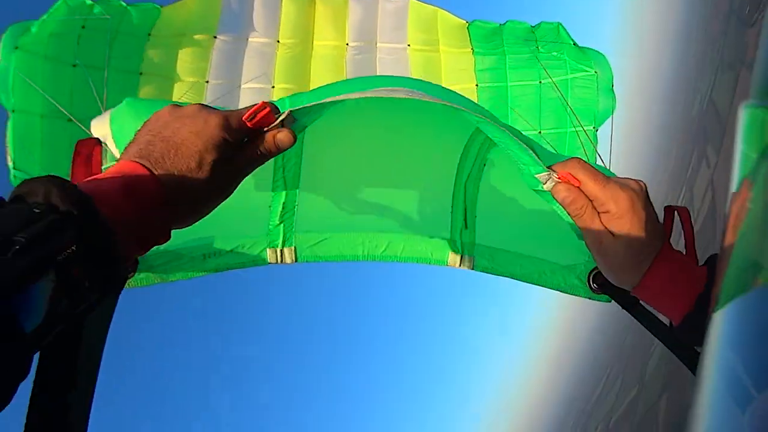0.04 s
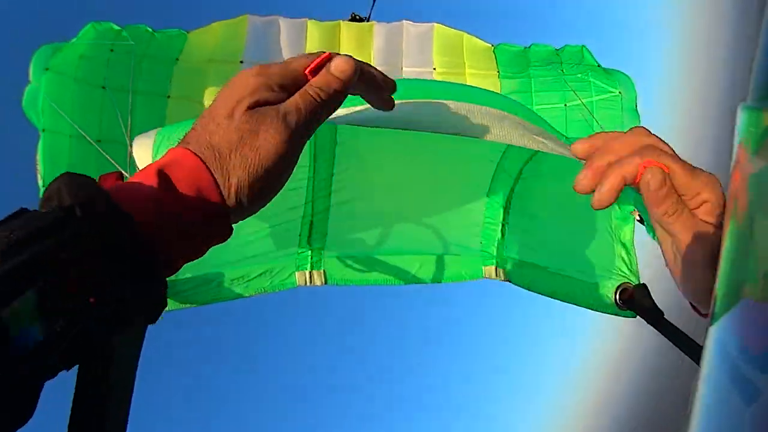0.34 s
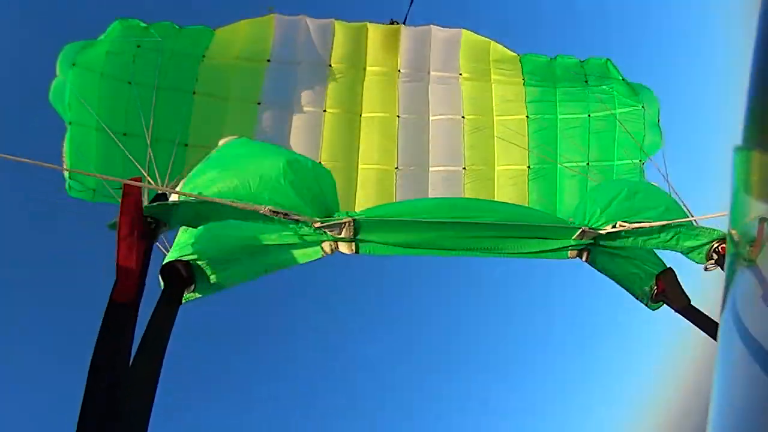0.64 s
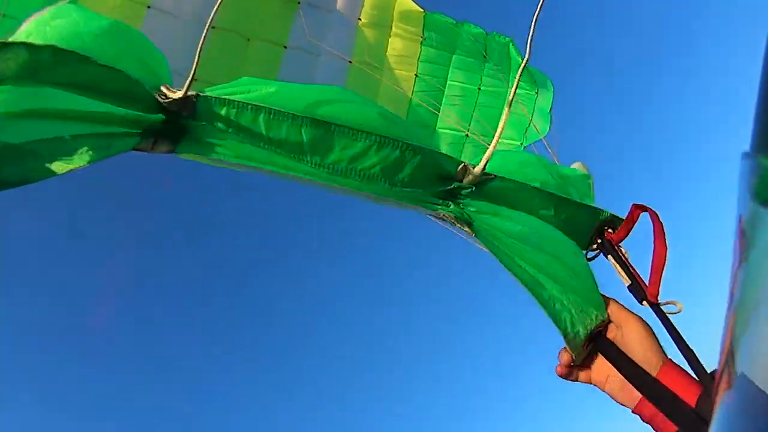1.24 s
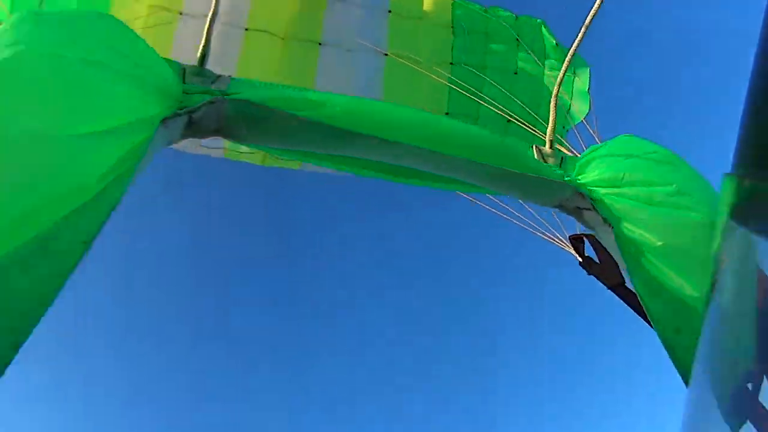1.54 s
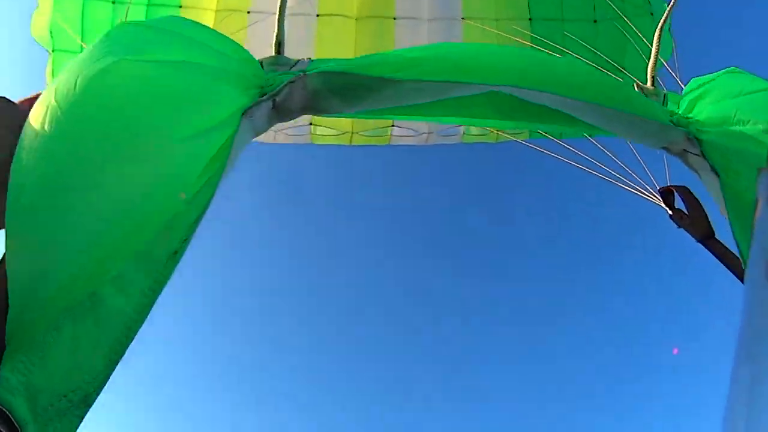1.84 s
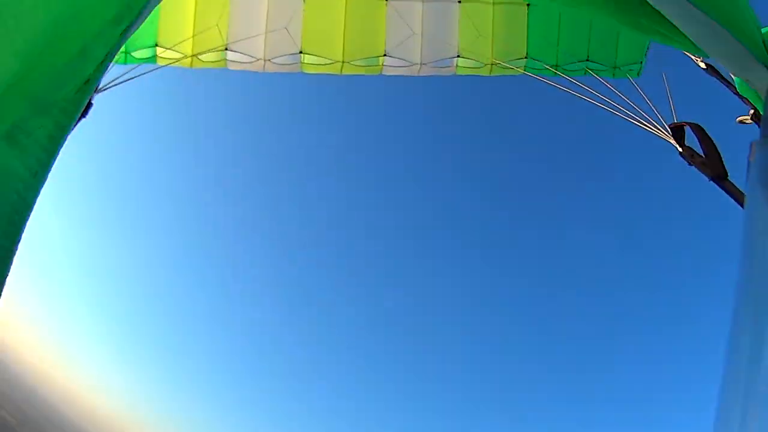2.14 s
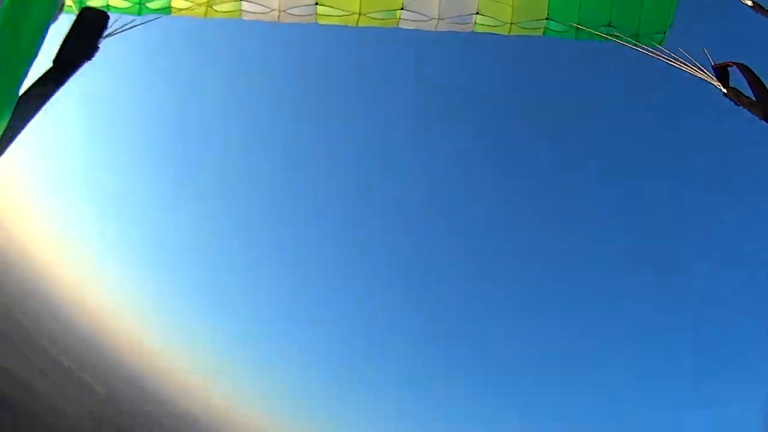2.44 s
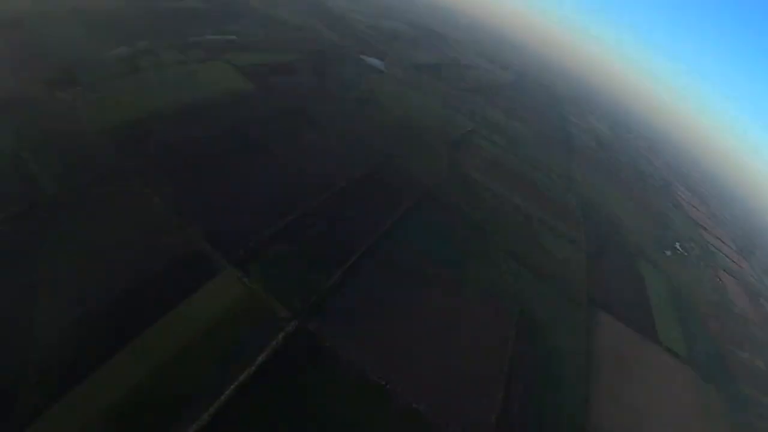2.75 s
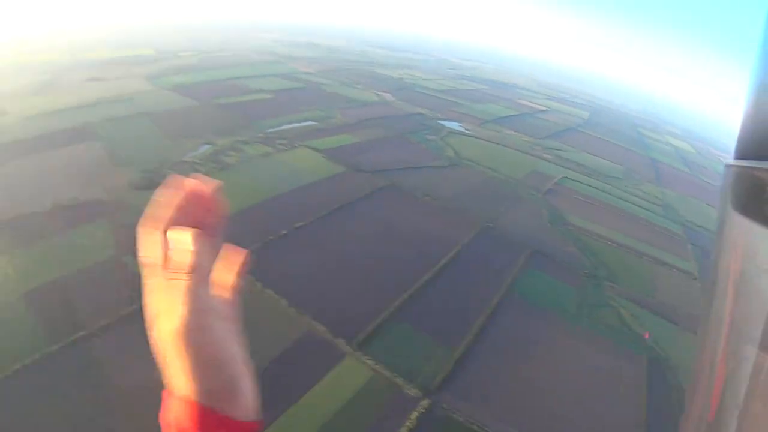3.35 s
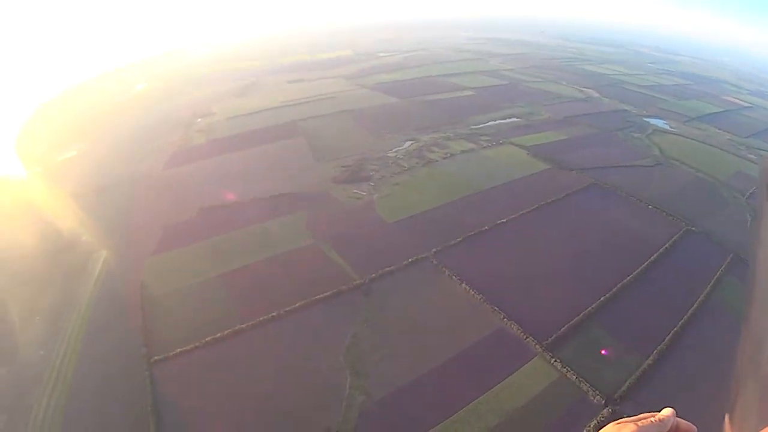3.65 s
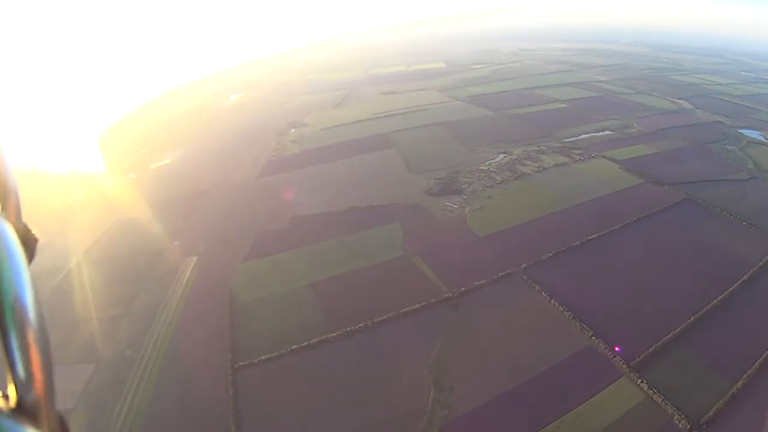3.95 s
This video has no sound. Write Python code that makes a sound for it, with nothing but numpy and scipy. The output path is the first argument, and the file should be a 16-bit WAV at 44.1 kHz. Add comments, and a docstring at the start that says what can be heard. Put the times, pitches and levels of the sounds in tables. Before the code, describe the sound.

Wind rushes and buffets a helmet microphone under an open parachute. For the first two seconds, fabric flaps, crackles and swishes close by as it is pulled down the lines. A low rumble follows, then a brief falling whistle around 2.5 seconds, and the wind drops to a softer rush. From 3.4 seconds it returns brighter and grows, with three light buckle clinks near 3.8 seconds.

```python
"""Wind on a helmet camera under an open parachute. From the start, turbulent eddies buffet the two
microphone ports over a smooth slipstream. Hands pull the fabric slider down the lines, and it flaps,
snaps, crackles and swishes. The head turns: its wake rumbles, the buffeting thins, and an edge tone
whistles and falls away, leaving the slipstream. Last, the turbulence returns from the side, brighter,
and a harness buckle rings three times."""
import sys
import numpy as np
from scipy import signal
from scipy.fft import rfft, irfft
from scipy.io import wavfile
from scipy.ndimage import uniform_filter1d, minimum_filter1d

SR = 44100
rng = np.random.default_rng(int(sys.argv[2]) if len(sys.argv) > 2 else 0)


def to_wav(s):
    """Save 16-bit WAV."""
    ch = np.atleast_2d(s).T  # columns
    pcm = np.round(np.clip(ch, -1, 1) * 32767)  # PCM
    wavfile.write(sys.argv[1], SR, pcm.astype(np.int16))


N = 176400
TIME = np.arange(N) / SR

# likeness of the two ports for eddies and for cloth: frequency_hz, coherence, right_lead_rad
EDDY_COHERENCE = [(30, 0.97, 0.21), (89, 0.95, 0.3), (200, 0.9, 1.13), (476, 0.65, 1.3), (660, 0.28, 2.55),
                  (1110, 0.51, 2.2), (1900, 0.87, 0.89), (2600, 1, 1.73), (3500, 0.49, 0.41),
                  (5100, 0.82, .05), (8000, .5, .2)]
CLOTH_COHERENCE = [(200, 0.91, .6), (1900, 0.96, 1), (2600, 1, 0.6), (5100, 0.88, .05), (9000, .6, .1)]


def amp(db):
    """Decibels to amplitude ratio."""
    return 10 ** (np.asarray(db) / 20)


def unit(x):
    """Normalisation to rms 1."""
    return x / np.sqrt(np.mean(x ** 2) + 1e-20)


def over_hz(table, hz):
    """Interpolation of each column of a table along log frequency."""
    f, *columns = np.transpose(table)
    return [np.interp(np.log(hz + 1), np.log(f + 1), column) for column in columns]


def level(curve):
    """Gain interpolated in decibels, fading at 400 dB/s beyond the ends of the curve."""
    time_s, db = np.transpose(curve)[:2]
    outside_s = np.maximum(np.maximum(time_s[0] - TIME, TIME - time_s[-1]), 0)
    return amp(np.interp(TIME, time_s, db) - 400 * outside_s)


def strikes(table, rise_s, decay_s):
    """Superposed envelopes of transients with exponential rise and decay."""
    start_s, db = np.transpose(table)
    age = np.maximum(TIME - start_s[:, None], 0)
    return amp(db) @ ((1 - np.exp(-age / rise_s)) * np.exp(-np.minimum(age / decay_s, 50)))


def swells(table):
    """Superposed Gaussian envelopes."""
    return sum(amp(db) * np.exp(-((TIME - middle) / sigma) ** 2 / 2) for middle, sigma, db in table)


def flutter(slow_hz, fast_hz):
    """Band-limited random modulation, rms 1."""
    f = np.fft.rfftfreq(N, 1 / SR)
    band = f / (f + slow_hz) ** 1.5 / (1 + (f / fast_hz) ** 4)
    return unit(irfft(rfft(rng.standard_normal(N)) * band, N))


def port_noise(colour, ports, flow=None, eddies=None):
    """Partly coherent noise of steady power at two ports; vortex shedding adds a hump at the eddy rate."""
    hz = np.fft.rfftfreq(2048, 1 / SR)
    frame_s = np.arange(N // 512 + 5) * 512 / SR
    a, b, c, d = rng.standard_normal((4, len(frame_s), len(hz)))
    left, independent = a + 1j * b, c + 1j * d
    shape = amp(over_hz(colour, hz)[0])[None] * (hz > 0)
    coherence, lead = over_hz(ports, hz)
    if flow is not None:
        time_s, _, rates = np.transpose(flow)
        rise, fall, bend, hump_db, width_octaves, common = eddies
        wander_octaves = 0.19 * np.interp(frame_s, TIME, flutter(slow_hz=2.0, fast_hz=15.3))
        rate = (np.interp(frame_s, time_s, rates) * 2 ** wander_octaves)[:, None]
        ratio = (hz + 1) / rate
        hump = np.exp(-(np.log2(ratio) / width_octaves) ** 2 / 2)
        slopes = ratio ** rise / (1 + ratio ** bend) ** ((rise + fall) / bend)
        shape = shape * amp(hump_db * hump) * slopes
        coherence = coherence + (1 - coherence) * common * hump
        lead = lead * (np.median(rates) / rate) ** 0.42  # faster eddies cross between the ports sooner
    shape = shape / np.linalg.norm(shape, axis=1, keepdims=True)
    coherence = np.clip(coherence, 0, 1)
    right = (coherence * left + np.sqrt(1 - coherence ** 2) * independent) * np.exp(1j * lead)
    spectra = np.array([left, right]) * shape
    _, noise = signal.istft(spectra, nperseg=2048, noverlap=1536, time_axis=1, freq_axis=2)
    return unit(noise[:, :N])


def turbulent(air, split_hz, burst_db, flap_db):
    """Intermittency: the fine eddies above the split come in quick bursts and slower flaps."""
    f = np.fft.rfftfreq(N, 1 / SR)
    low = irfft(rfft(air) / (1 + (f / split_hz) ** 4), N)
    quick_db = burst_db * flutter(slow_hz=70, fast_hz=350)
    slow_db = flap_db * flutter(slow_hz=5.6, fast_hz=45.6)
    return low + (air - low) * unit(amp(quick_db + slow_db))


def buffet():
    """Convected turbulence: eddies cross the right port, then the left; slow ones are the most ragged."""
    # air tumbling across the ports: time_s, level_db, eddy_rate_hz
    flow = [(0, -14, 114), (0.301, -8, 122.4), (0.41, -12.5, 153.5), (0.505, -9, 222.5), (.62, -14, 166),
            (0.739, -14.5, 125), (.82, -12, 105), (.87, -13.5, 130), (.97, -11.5, 138.6),
            (1.13, -11, 150.3), (1.3, -12.5, 203), (1.601, -12.5, 217), (1.88, -12.5, 233),
            (2.05, -16, 445), (2.16, -16.5, 446), (2.31, -14, 391), (2.35, -18, 520), (2.5, -21, 600),
            (2.611, -18.5, 554), (2.655, -23.5, 469), (2.689, -29, 400), (2.72, -34, 259)]
    # response of the camera housing: frequency_hz, gain_db
    housing = [(20, -12), (45, 5), (80, 6), (180, 0.5), (310, -2.5), (420, -0.5), (530, 0), (630, -6.5),
               (1000, -8.5), (1450, -10.5), (1950, -11), (2500, -19), (3500, -23.5), (4050, -20),
               (5100, -10.5), (5900, -21.5), (7500, -28.5), (11000, -59.5)]
    # eddy spectrum: rise_exponent, fall_exponent, bend_sharpness, hump_db, width_octaves, common_share
    eddies = (1.96, 1.477, 1.96, 1.5, 0.72, 0.44)
    time_s, _, rate_hz = np.transpose(flow)
    ragged = np.minimum(190 / np.interp(TIME, time_s, rate_hz), 1)
    air = port_noise(housing, EDDY_COHERENCE, flow, eddies)
    gusts = turbulent(air, split_hz=530, burst_db=2.9 * ragged, flap_db=1.1 * ragged ** 2)
    return amp(0.5) * level(flow) * gusts


def slipstream():
    """Broadband flow noise past lines and canopy, lightly modulated by flutter, a little to the right."""
    # smooth rush: time_s, level_db
    flow = [(0, -47), (0.25, -46.5), (0.5, -47.5), (0.72, -48.5), (1.05, -45.5), (1.4, -45.5),
            (1.85, -47.5), (2.1, -43.5), (2.58, -38.5), (2.75, -46), (3.0, -48), (3.3, -44.5), (3.65, -45),
            (3.92, -37.5), (4.0, -39.5)]
    # its spectrum: frequency_hz, density_db
    colour = [(20, -18), (60, 3.5), (150, 3.5), (220, 6.5), (360, 4.5), (420, 6.5), (500, 7.5), (555, 0),
              (620, -5.5), (700, 7), (780, -6.5), (860, -9.5), (1130, -5.5), (1260, -8.5), (1700, -2.5),
              (2020, -2), (2300, -12.5), (2650, -17.5), (3400, -11.5), (4000, -17.5), (4400, -14.5),
              (4750, -20.5), (5150, -11.5), (5800, -24.5), (7000, -30), (7600, -29.5), (8600, -37),
              (10000, -39), (11000, -49.5)]
    # likeness of the ports: frequency_hz, coherence, right_lead_rad
    ports = [(60, 1, .2), (250, 0.94, 0.67), (496, 0.57, 0.64), (734, 0.86, 2.53), (1230, 0.71, 1.45),
             (1900, 1, 0.67), (2610, 0.16, 1.6), (3600, 0.98, 1.1), (4000, 0.073, 0.22), (5070, 0.94, .05),
             (7000, 0.25, .3)]
    rush = turbulent(port_noise(colour, ports), split_hz=100, burst_db=0.26, flap_db=1.15)
    return amp(12) * level(flow) * rush * amp([[-0.4], [0.4]])


def slider_flaps():
    """Pressure transients: slack cloth cracks in the wind and throws dull puffs of air at the ports."""
    # flaps of the slider: start_s, level_db
    flaps = [(.078, -21), (.364, -13), (.411, -28), (.867, -14.5), (.886, -25), (.938, -18), (1.696, -10.5),
             (1.854, -22), (1.908, -22), (2.758, -31), (2.786, -39), (2.819, -29.5)]
    # their spectrum: frequency_hz, density_db
    colour = [(60, -2.5), (250, 2.5), (550, 4.5), (1100, -3.5), (1900, -15), (2600, -28.5), (5000, -32.5),
              (8000, -60)]
    return amp(5.5) * port_noise(colour, EDDY_COHERENCE) * strikes(flaps, rise_s=0.0047, decay_s=0.0091)


def fabric_crackle():
    """Impulsive noise: gathered cloth gives single snaps and dense crackle, a little to the right."""
    # snaps of fabric and lines: start_s, level_db
    snaps = [(.366, -38), (0.382, -50), (.409, -39), (.525, -35.5), (.778, -33), (.938, -41), (1.124, -39),
             (1.21, -35.5), (1.233, -37), (1.253, -36), (1.286, -37), (1.299, -36), (1.348, -42),
             (1.643, -41), (1.735, -37.5), (1.785, -45), (2.579, -32.5), (2.715, -39), (2.757, -42),
             (2.786, -40), (2.818, -39)]
    # handfuls of cloth being gathered: middle_s, sigma_s, level_db
    rustles = [(.47, 0.039, -42), (0.589, 0.01, -44), (1.27, 0.06, -41.5), (1.44, 0.047, -43),
               (1.6, .05, -41), (1.77, 0.034, -42)]
    # spectrum of the cloth: frequency_hz, density_db
    colour = [(100, -16.5), (500, -10), (1200, 9.5), (1900, 13.5), (2500, -2.5), (3400, 2.5), (4100, 0.5),
              (5150, 6), (6000, -7), (7000, -13), (7700, -15.5), (8800, -25), (10000, -23.5), (11000, -36)]
    snapping = amp(12) * strikes(snaps, rise_s=0.0012, decay_s=0.004)
    grain = unit(amp(10 * np.tanh(flutter(slow_hz=40, fast_hz=404) - 0.8)))
    crackling = amp(4.5) * swells(rustles) * grain
    return port_noise(colour, CLOTH_COHERENCE) * (snapping + crackling) * amp([[-0.6], [0.6]])


def nylon_swishes():
    """Sliding friction: nylon on the lines makes a bright, grainy hiss, a little to the left."""
    # slides along the lines: middle_s, sigma_s, level_db
    slides = [(.588, 0.024, -43), (.638, 0.0054, -43.5), (.7, 0.0035, -45.5), (.782, 0.0097, -45),
              (1.44, 0.033, -47)]
    # friction spectrum: frequency_hz, density_db
    colour = [(1500, -21), (3000, 0.5), (5100, 7), (6200, -2), (7000, -10), (7700, -3.5), (8800, -16),
              (10000, -14), (11000, -23)]
    grain = unit(amp(3.6 * flutter(slow_hz=100, fast_hz=600)))
    return port_noise(colour, CLOTH_COHERENCE) * swells(slides) * grain * amp([[0.7], [-0.7]])


def wake_rumble():
    """Wake turbulence: deep pressure swings behind the turning head."""
    # strength of the wake: time_s, level_db
    wake = [(1.75, -44), (1.87, -26.5), (2.1, -31.5), (2.3, -33.5), (2.6, -40), (2.8, -61), (3.42, -48),
            (3.56, -32), (3.7, -29), (3.8, -36)]
    # its spectrum: frequency_hz, density_db
    colour = [(20, -22), (60, 0), (120, 0.5), (200, -8.5), (500, -36), (2000, -70)]
    return port_noise(colour, EDDY_COHERENCE) * level(wake)


def edge_whistle():
    """An edge tone: a narrow band of noise whose pitch falls as the camera turns out of the flow."""
    # air over an edge of the camera: time_s, level_db, pitch_hz
    tone = [(2.498, -37, 1504), (2.543, -22.5, 1620), (2.575, -22, 1640), (2.617, -26, 1520),
            (2.645, -27, 1243), (2.685, -36, 1030), (2.71, -42, 909)]
    time_s, _, pitch_hz = np.transpose(tone)
    carrier = np.exp(2j * np.pi * np.cumsum(np.interp(TIME, time_s, pitch_hz)) / SR)
    pole = np.exp(-np.pi * 390 / SR)  # each of two poles is 390 Hz wide
    noise = rng.standard_normal((3, N)) + 1j * rng.standard_normal((3, N))
    shared, left, right = signal.lfilter([1], np.poly([pole, pole]), noise)
    ports = np.array([shared + 0.5 * left, shared * np.exp(1j) + 0.5 * right])  # right leads by 1 rad
    return level(tone) * unit((ports * carrier).real)


def eddy_puffs():
    """Pressure pulses: single eddies reach both ports in phase; big ones thump, small ones knock."""
    # eddies that stand out: middle_s, level_db, pitch_hz, sigma_s
    puffs = [(2.68, -23, 90, 0.0052), (2.703, -27, 450, .003), (2.706, -21, 850, 0.0022),
             (3.606, -22, 100, .007), (3.689, -25, 110, .006)]
    pressure = np.zeros(N)
    for middle_s, db, hz, sigma_s in puffs:
        pressure += swells([(middle_s, sigma_s, db)]) * np.sin(2 * np.pi * hz * (TIME - middle_s))
    return np.array([pressure, pressure])


def side_gust():
    """Cross-flow turbulence: brighter, more even, and only partly coherent between the ports."""
    # air striking from the side: time_s, level_db, eddy_rate_hz
    flow = [(3.34, -40, 900), (3.385, -23.5, 1080), (3.48, -18.5, 1040), (3.6, -22.5, 890),
            (3.71, -24, 900), (3.77, -20, 1070), (3.84, -14, 1180), (3.91, -14.5, 1330), (4.0, -13.5, 1330)]
    # response to side flow: frequency_hz, gain_db
    colour = [(20, -14), (55, -11), (150, -8), (300, -5), (600, -8), (800, -7.5), (1100, -6), (1500, -9),
              (2000, -14), (2600, -18), (5000, -7), (11000, -28)]
    # likeness of the ports: frequency_hz, coherence, right_lead_rad
    ports = [(50, 1, 0.5), (249, 0.77, 0), (500, 0.091, 0.66), (790, 0.57, 1.5), (1150, 0.83, 2.5),
             (2000, 0.11, 2.5), (5000, .5, 1)]
    # eddy spectrum: rise_exponent, fall_exponent, bend_sharpness, hump_db, width_octaves, common_share
    eddies = (0.12, 4.7, 7.2, 0.51, 0.4, .05)
    air = port_noise(colour, ports, flow, eddies)
    return amp(-2) * level(flow) * turbulent(air, split_hz=340, burst_db=0.5, flap_db=1.0)


def buckle_taps():
    """Modal ringing: a tapped buckle sounds as damped sinusoids, a little to the left."""
    # taps of harness hardware: start_s, level_db
    taps = [(3.749, -20.5), (3.84, -25), (3.853, -22)]
    # modes of the buckle: frequency_hz, level_db, t60_s
    modes = [(3540, -8, 0.027), (3600, -18, 0.03), (4950, -11.5, 0.035)]
    ring = np.zeros(N)
    for start_s, tap_db in taps:
        age = np.maximum(TIME - start_s, 0)
        for hz, mode_db, t60_s in modes:
            ring += amp(tap_db + mode_db - 60 * age / t60_s) * np.sin(2 * np.pi * hz * age)
    return ring * amp([[0], [-3]])


def scene():
    """Superposition of air and handling sounds at the two ports."""
    descent = buffet() + slipstream() + slider_flaps() + fabric_crackle() + nylon_swishes()
    return descent + wake_rumble() + edge_whistle() + eddy_puffs() + side_gust() + buckle_taps()


def record(dry):
    """Peak limiting holds down the buffets; a low-pass filter then limits the bandwidth."""
    threshold_db, excess_share, release_db_per_s, cutoff_hz = -6, 0.83, 118.5, 11150
    mid_db = 20 * np.log10(abs(dry.mean(0)) + 1e-9)
    release_db = TIME * release_db_per_s
    peak_db = np.maximum.accumulate(mid_db + release_db) - release_db
    cut_db = np.minimum(threshold_db - peak_db, 0)
    smooth_cut_db = uniform_filter1d(minimum_filter1d(cut_db, size=120), size=120)
    limited = dry * amp(excess_share * smooth_cut_db)
    lowpass = signal.firwin(511, cutoff_hz, window=("kaiser", 9), fs=SR)
    return signal.oaconvolve(limited, lowpass[None], "same")


dry = scene()
out = record(dry)
to_wav(out)
```